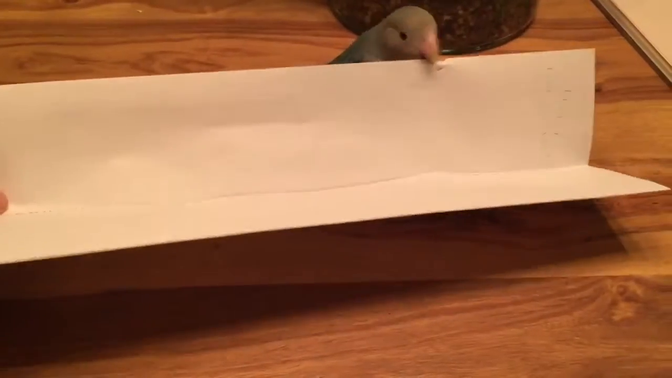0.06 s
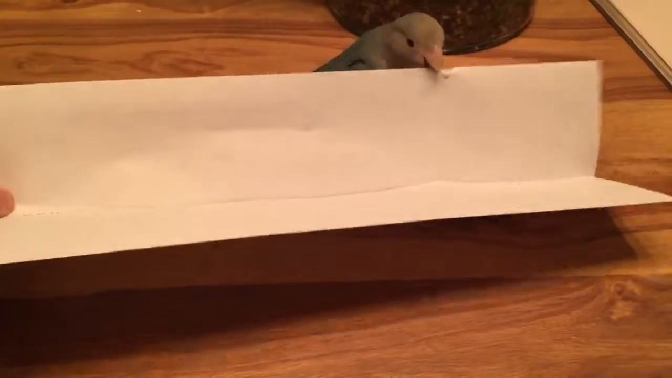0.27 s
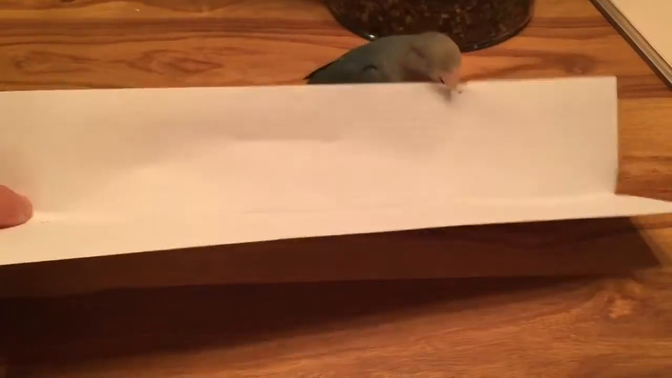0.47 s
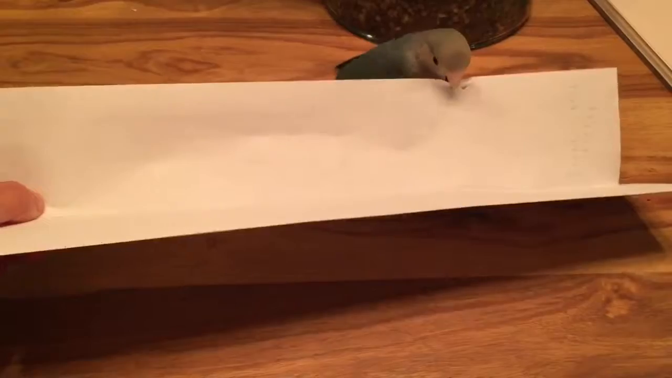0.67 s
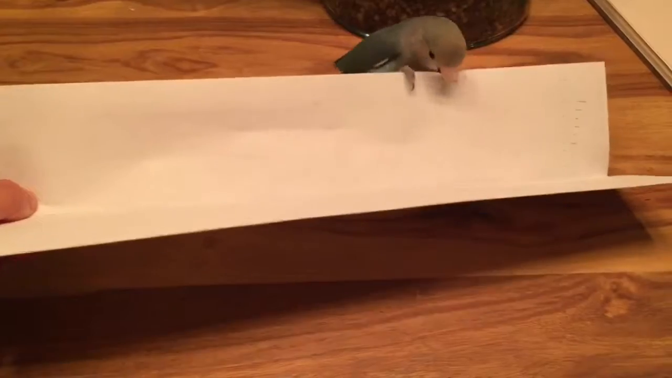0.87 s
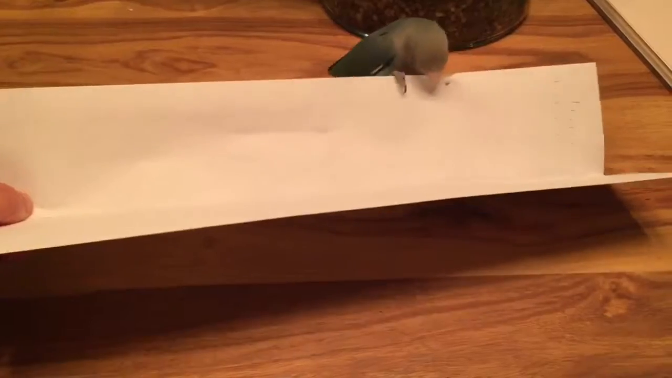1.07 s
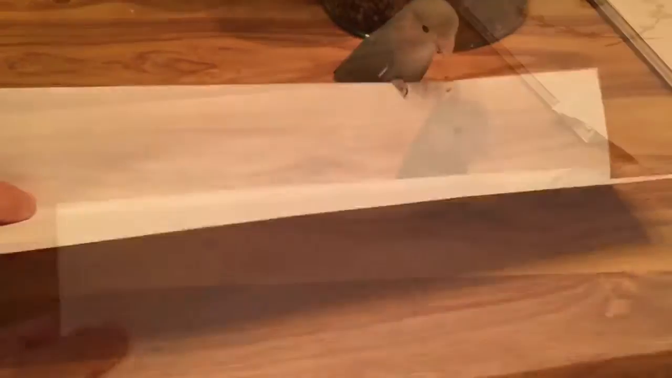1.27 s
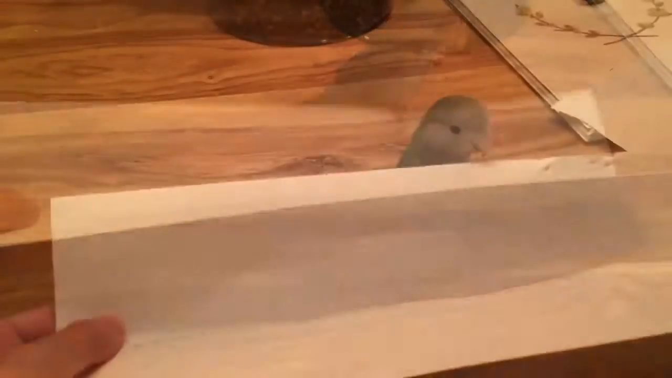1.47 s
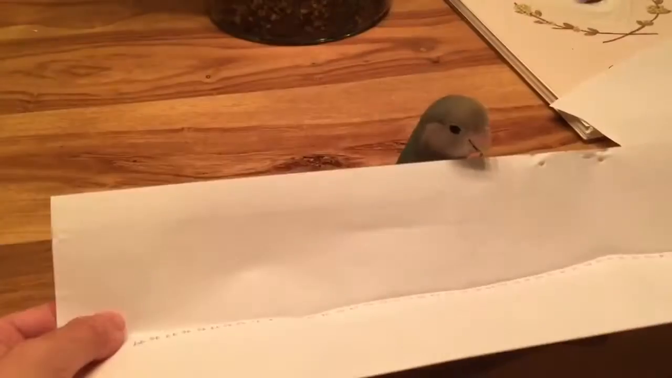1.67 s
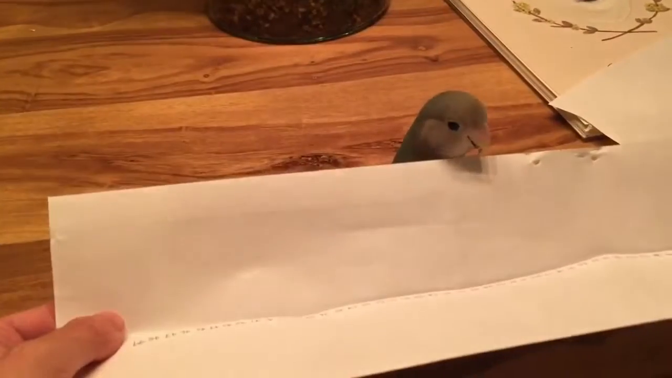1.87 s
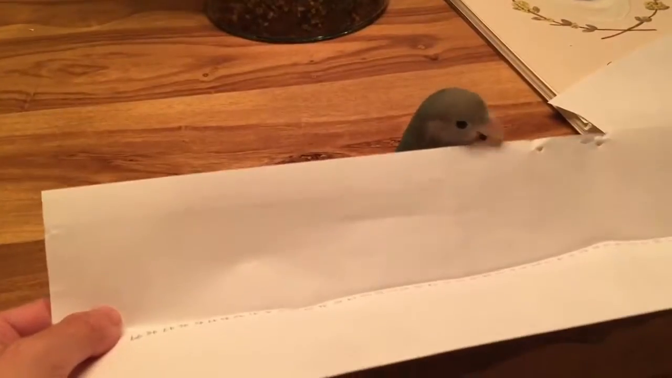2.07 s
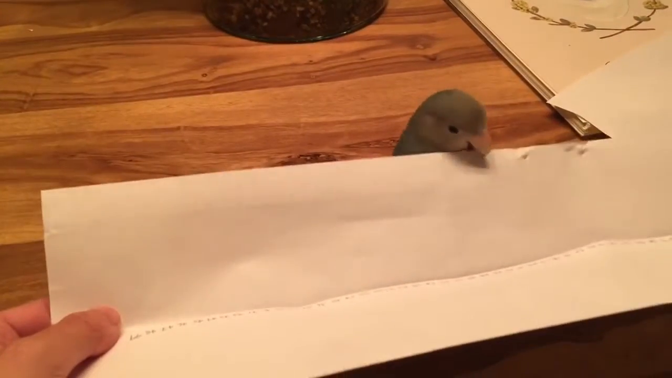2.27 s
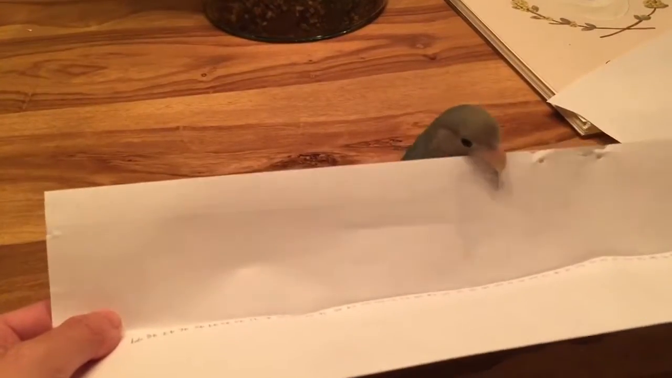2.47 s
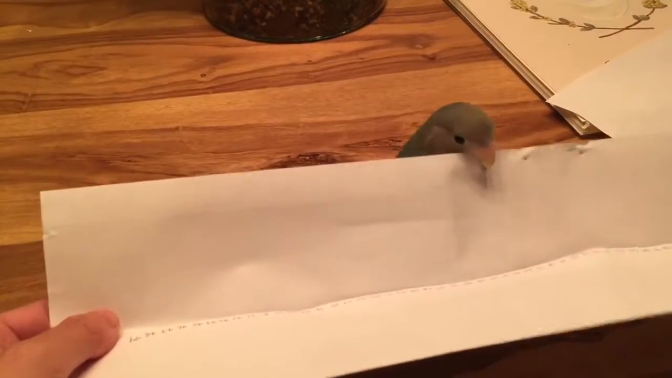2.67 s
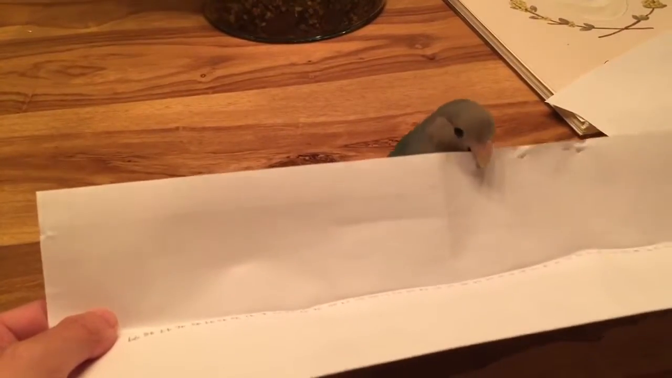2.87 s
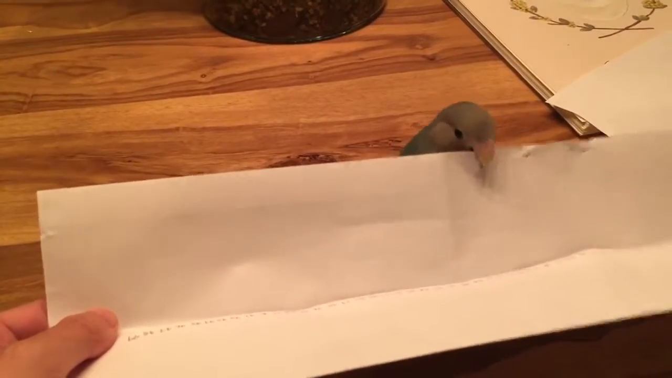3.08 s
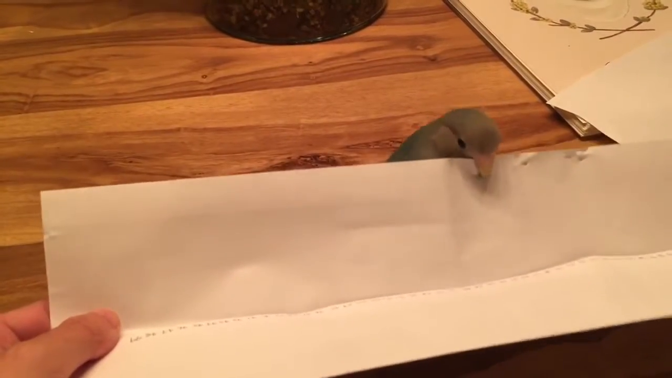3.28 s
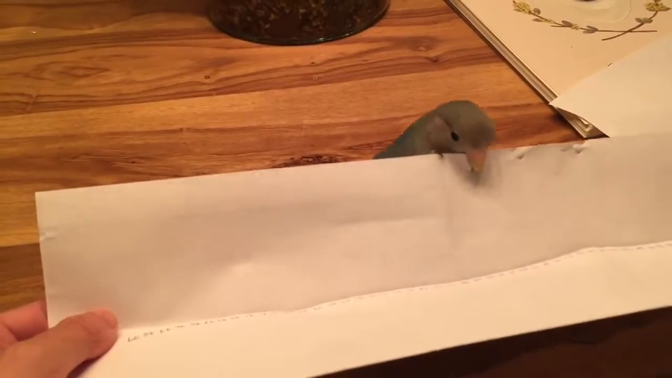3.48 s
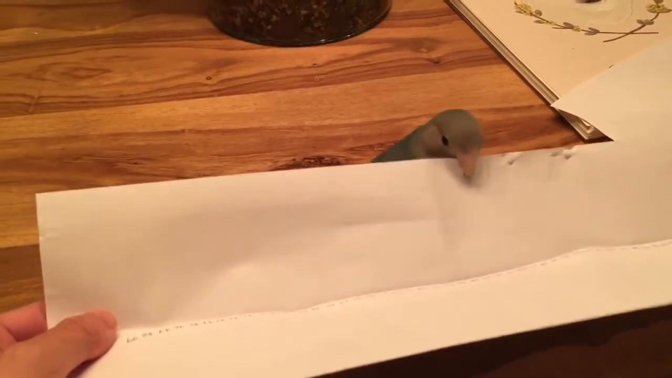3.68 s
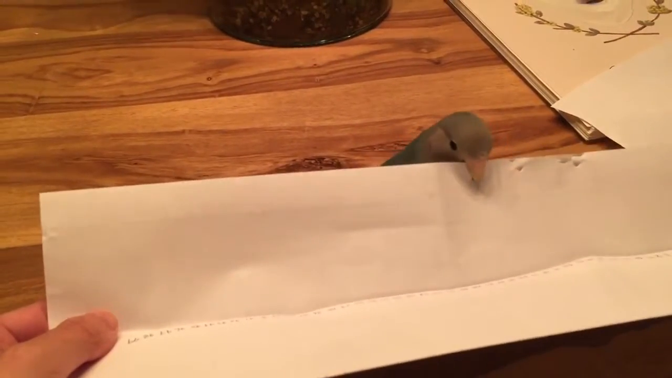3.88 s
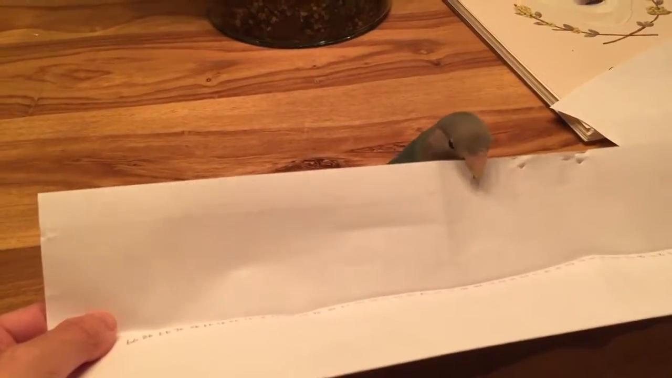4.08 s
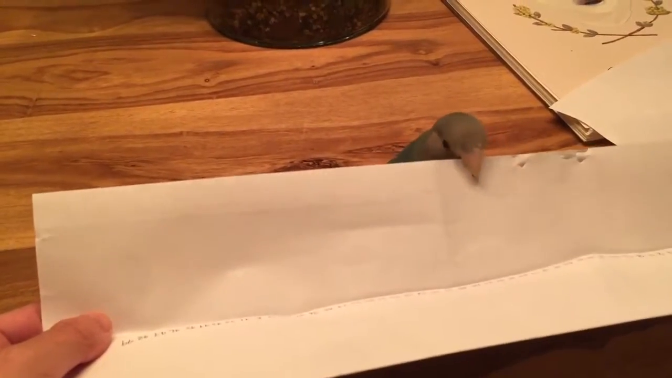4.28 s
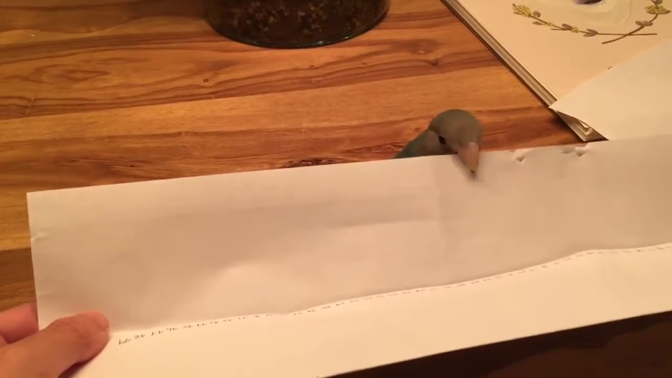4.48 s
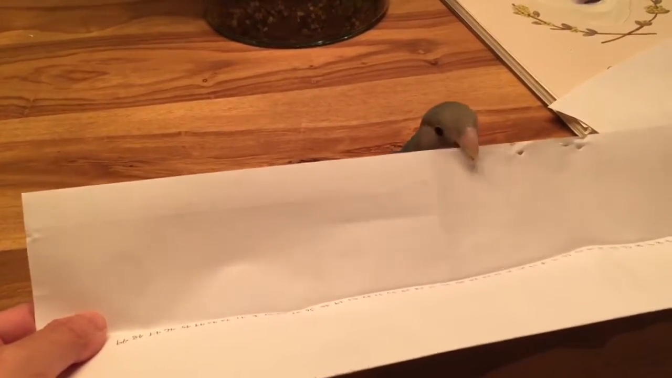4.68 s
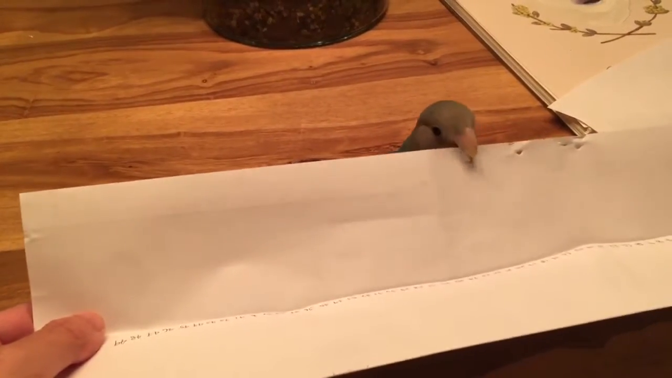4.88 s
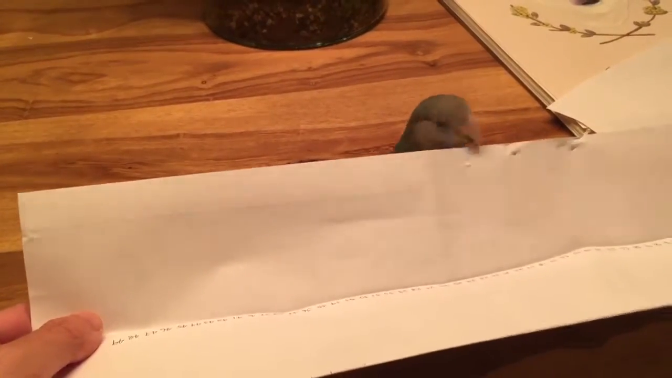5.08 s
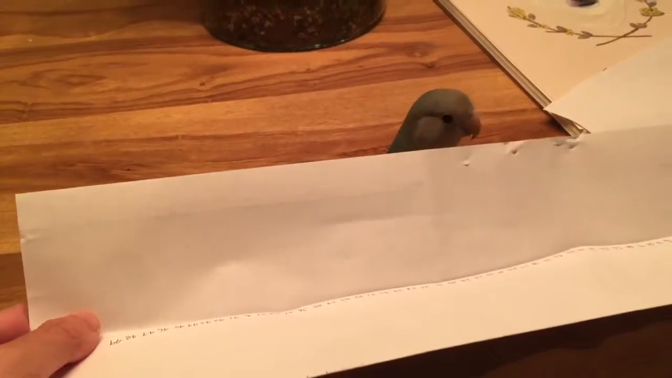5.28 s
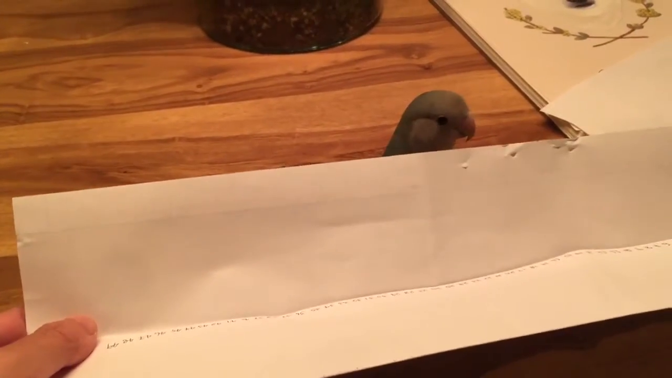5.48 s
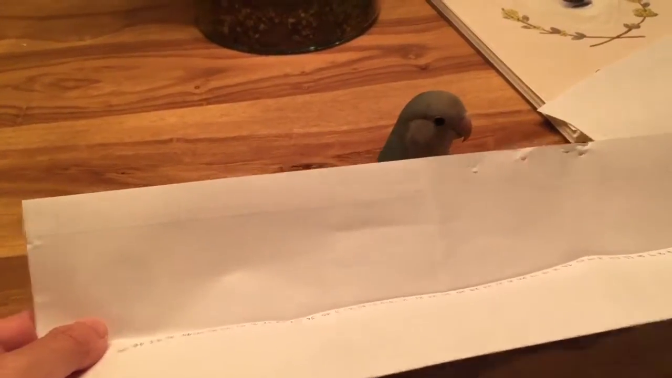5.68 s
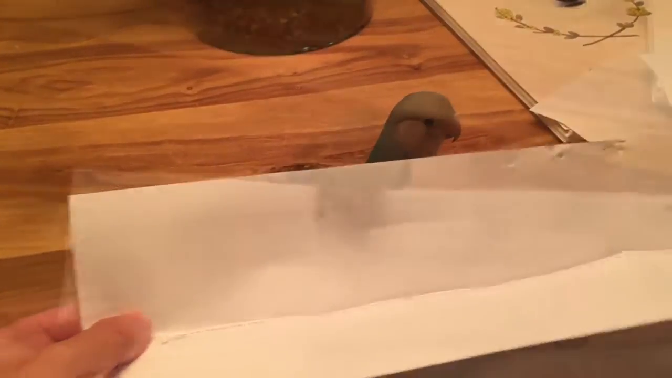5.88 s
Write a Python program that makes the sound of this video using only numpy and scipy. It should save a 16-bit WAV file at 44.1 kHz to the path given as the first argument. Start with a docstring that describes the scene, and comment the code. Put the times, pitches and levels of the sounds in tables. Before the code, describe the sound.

A small bird chews the edge of a hand-held paper sheet close to a phone microphone in a quiet room. From 0 s come small dry nibbles and scratchy rubs, with a sharp snap near 0.5 s, a harder one near 0.8 s and a tight run of crisp bites around 1 s. Fine crackling continues to about 1.4 s, then nearly stops apart from a faint tick at 1.55 s; the background hiss drops too. Light picking returns from 2.15 to 2.6 s, with firm snaps at 2.8 and 2.9 s. The loudest crack comes at about 3.3 s, followed by dense tearing scrapes and clicks until 3.8 s. Afterwards there are sparse, softer ticks and short crackles, one clearer snip at 5.2 s, and almost nothing after 5.3 s except a tiny scrape near 5.8 s. A faint, unsteady low hum runs throughout, and the room adds only a short, faint tail.

```python
"""Beak on a paper edge

A small bird bites along the edge of a hand-held paper sheet, close to a phone microphone, in a quiet room.
Snaps (a blow and a dying rattle) and scrapes (ticks over a rub) are noise forces; they excite resonances
of the sheet, its slow flexing and its tearing fibres. The room answers with a short decaying noise tail.
An appliance hums as unsteady sines and noise in low room modes; smooth noise makes the hiss."""
import sys
import numpy as np
from scipy import signal
from scipy.fft import rfft, irfft, next_fast_len
from scipy.io import wavfile
from scipy.ndimage import uniform_filter1d, map_coordinates

SR = 44100
rng = np.random.default_rng(int(sys.argv[2]) if len(sys.argv) > 2 else 0)


def int16_out(signal):
    """Quantize to a 16-bit WAV file."""
    q = np.round(np.clip(np.atleast_2d(signal).T, -1, 1) * 32767)
    wavfile.write(sys.argv[1], SR, q.astype(np.int16))


N = 261072
SIZE = 8192  # samples in the window of one snap or scrape
RING_NOTE_WIDTH, CRACK_NOTE_WIDTH = 0.1, 0.16  # note bandwidth over its centre frequency


def amp(db):
    """Level: a gain is ten to the power of dB / 20."""
    return 10 ** (np.asarray(db) / 20)


def unit(x):
    """Normalisation: scale each row to a root mean square of 1."""
    return x / np.sqrt(np.mean(np.abs(x) ** 2, axis=-1, keepdims=True) + 1e-20)


def along(points, hz):
    """Interpolation of (Hz, value) points on a logarithmic frequency axis."""
    f, v = np.transpose(points)
    return np.interp(np.log(hz + 1), np.log(f + 1), v)


def wobble(rate):
    """Slow modulation: a smooth curve through random knots, rate of them a second."""
    return map_coordinates(rng.standard_normal(int(N * rate / SR) + 4), [np.arange(N) * rate / SR])


def filtered(x, response):
    """Linear filtering: multiply the spectrum of x by a response of frequency."""
    m = next_fast_len(N + SR // 2)
    return irfft(rfft(x, m) * response(np.fft.rfftfreq(m, 1 / SR)), m)[:N]


def peak(f, hz, width):
    """Resonance of one causal damped oscillator, with unit gain at its centre."""
    return 1j * f * width / (hz * hz - f * f + 1j * f * width)


def shaken(force, modes, hz, spread, scatter_db, note=0):
    """Modal response: each force drives a broad hump at hz, modes of chance strength and its own note."""
    f = np.fft.rfftfreq(SIZE, 1 / SR)
    radiated = 1j * f / (1j * f + 0.35 * hz)  # a thin sheet sheds its bass poorly
    luck = amp(scatter_db * rng.standard_normal((len(force), len(modes))))
    resonances = np.array([amp(db) * peak(f, centre, width) for centre, width, db in modes])
    body = 1 + 0.9 * luck @ resonances
    hump = peak(f, hz, hz * spread) ** 2
    response = unit(body * (1 + note) * radiated * hump)
    return irfft(rfft(force) * response, SIZE)


def paper(s, force, db, thud_db, crack_db, hz, crack_hz, notes):
    """Superposition: a force on the edge rings the sheet, flexes it and cracks fibres.

    force(stretch) may lengthen its decay; the flap in the beak adds notes to the ring and the crack."""
    # Resonances of the sheet, its slow flexing and its tearing fibres.
    # Each row: centre in Hz, width in Hz, relative level in dB before the chance scatter.
    sheet_modes = [(910, 140, 6), (1110, 410, 8), (1490, 180, 3.5), (1600, 550, -8.5), (2020, 300, 2.5),
                   (2500, 275, -1), (3000, 610, 1.5), (3700, 570, 1), (4212, 370, 2), (4690, 230, 0.5)]
    thud_modes = [(190, 240, -10), (322, 49, -11), (570, 46, -0.5)]
    fibre_modes = [(5700, 1500, 12), (7500, 2100, -5.5), (8900, 9000, -1.5), (13100, 2700, -10),
                   (14800, 6400, -13.5)]
    f = np.fft.rfftfreq(SIZE, 1 / SR)
    high_hz, high_db, note_hz, note_db = notes
    note = amp(note_db) * peak(f, note_hz, RING_NOTE_WIDTH * note_hz)
    high = amp(high_db) * peak(f, high_hz, CRACK_NOTE_WIDTH * high_hz)
    ring = shaken(force(1), sheet_modes, hz, 1.425, scatter_db=2, note=note)
    thud = shaken(force(4.4), thud_modes, 500, 2.5, scatter_db=5.5)
    crack = shaken(force(0.74, fibres=True), fibre_modes, crack_hz, 14.0, scatter_db=2.5, note=note + high)
    sound = amp(db) * (ring + amp(thud_db) * thud + amp(crack_db) * crack)
    at = (s * SR).astype(int) + np.arange(SIZE)
    return np.bincount(at.ravel(), sound.ravel(), N + SIZE)[:N]


def bending(x):
    """Varying radiation: as the sheet bends, patches of frequency and time swell and sink."""
    depth_db = 2.0  # standard deviation of the patches
    z = signal.stft(x, nperseg=256)[2]
    field = uniform_filter1d(rng.standard_normal(z.shape), size=4, axis=0)
    field = uniform_filter1d(field, size=4, axis=1)
    return signal.istft(z * amp(depth_db * field / field.std()), nperseg=256)[1][:N]


def scrapes():
    """Stick-slip friction: fibres give way as ticks of chance size over a smoother rub, under a rounded stroke."""
    # The beak dragging on the edge.
    # Each row: start in seconds, nominal length in ms, strength in dB, crack gain in dB re ring,
    # centre in Hz, crack note in Hz, its level in dB, ring note in Hz, its level in dB.
    drags = [(0.0, 38.3, -40.5, -11.5, 1510.0, 6400, 2, 1700, 7),
             (0.04, 61, -60, -28, 1500, 6000, -1, 1200, 2), (0.121, 39, -48, -3.5, 2200, 7300, -1, 1880, 6),
             (0.159, 44, -74, -5, 2000, 5400, 4, 1900, 3),
             (0.218, 14, -61, -7.0, 2400.0, 14100.0, 4.0, 1960.0, -5),
             (0.267, 37.5, -39.5, -11, 1620, 6300, 4.0, 1920, -6),
             (0.312, 53, -58, -20, 1400, 6000, 0, 1000, 0),
             (0.382, 19, -45, -12, 2150, 5900.0, 3, 3630.0, -13),
             (0.474, 16, -51, -10, 1800, 6300, 4, 1700, 2),
             (0.499, 80, -54.5, -14, 2190, 6300, 9, 2600, -12),
             (0.573, 42, -51, -1.5, 2020.0, 5460, 4, 915, 9.5),
             (0.614, 53, -55.5, -20, 1500, 6300, 0, 2000, -5),
             (0.647, 67, -54.5, -31.0, 1670, 8900.0, 4.0, 1160, 2.5),
             (0.677, 31, -50.5, -11, 1800, 8400, 2, 2600, -8),
             (0.701, 33, -56, -27, 1300, 6300, -2.5, 1000, 8),
             (0.752, 43, -58, -16, 1900, 6000, 0, 2000, 0),
             (0.801, 120, -44, -20, 1570, 14500.0, 3, 1690, 5),
             (0.874, 52, -55, -12, 1780, 9400.0, 5, 1650.0, 5),
             (0.914, 62, -39, -3, 2220, 9600.0, -3, 960, -4),
             (0.958, 38, -42, -23.0, 1690, 9700.0, 4.0, 1490.0, -14),
             (1.0, 77, -47.5, -2, 1800.0, 6460, -3, 990.0, -3),
             (1.052, 39, -45, -6, 2500.0, 9450, 12, 3360, 0),
             (1.09, 56, -53.5, -2, 2200, 11600.0, 2, 1360, -4),
             (1.135, 40, -58.5, -18, 1800, 6100, 0, 1500, 0),
             (1.164, 102, -46, -11, 1770, 6100.0, -5, 1490.0, -7),
             (1.22, 89, -50.5, -12, 1780, 5800.0, -1, 1200.0, 0),
             (1.271, 37, -42, -19, 1340, 9500, 6, 955, 2),
             (1.309, 18, -49, -8, 1390, 7800.0, 0, 910.0, -11),
             (1.335, 59, -62, -14, 2000, 5400, 0, 2500, 0),
             (1.388, 45, -61, -14, 2580.0, 5400.0, 2, 2250.0, -1),
             (1.545, 45.0, -54.5, -1.5, 2850, 14100.0, 2, 2810.0, 2),
             (1.584, 65, -56, -0.5, 2710, 8820, 6, 3300, -9),
             (2.152, 29, -57.5, -14.0, 2070.0, 7400.0, 3.5, 1650.0, -9),
             (2.194, 22.4, -49, -6, 2020.0, 5900.0, -14, 2060, 9),
             (2.256, 63.0, -61, -8, 1470.0, 7600.0, -1, 1200.0, 1.0),
             (2.292, 99, -52.5, -10, 2180, 7500, 1, 4320, -6),
             (2.366, 15, -48.5, -10, 2750, 8250, 1, 3830, -7),
             (2.393, 24, -49, -6, 2430, 8300.0, 1, 3820, -7),
             (2.447, 45, -49.5, -8.5, 1900.0, 13100.0, 3, 1580, 4),
             (2.7, 31, -60, -9, 1500, 5770, 8, 960.0, 16),
             (2.726, 41, -44.5, -9, 1250.0, 5860, 0, 1490.0, 4),
             (2.759, 38, -46, -2.5, 1800.0, 6600.0, -9, 1500, -6),
             (2.808, 14.4, -41, -14, 2000.0, 7300.0, 4.0, 1030.0, -3),
             (2.832, 66, -53.5, -16, 1700.0, 6100.0, 4.0, 2450.0, 0),
             (2.932, 78, -54.5, -10, 2360, 6400.0, 9, 1090, 7),
             (3.0, 90, -66.5, -12, 2200, 6400, 0, 1100, 3),
             (3.104, 11, -52, -6.5, 1240.0, 14700, 6, 977, 2), (3.188, 18, -60, -4, 1400, 6430, 0, 1000, 3),
             (3.205, 63, -59, -9, 1360, 13200, -3.5, 920, 8),
             (3.292, 51, -52, -14, 1330, 13500.0, 4.0, 1490.0, -1),
             (3.345, 148, -38, -8.5, 2020.0, 6400.0, 2, 1980, -0.5),
             (3.412, 32, -33, -17, 3200, 6300.0, 6, 4120, -3),
             (3.428, 27, -29.5, -31, 2170, 6300.0, 2, 2060, -3),
             (3.438, 44, -35, -24, 1420, 14300.0, 4.0, 1250, 7),
             (3.471, 12, -39.5, -1, 3000.0, 14400, 0, 1600.0, 3),
             (3.491, 84, -46, -25, 1780.0, 12600.0, 4.0, 1380, -5),
             (3.519, 21, -37.5, -18, 2010, 5370, 11, 1420, 6.5),
             (3.546, 160, -55, -11.0, 1810.0, 12600.0, 0, 890.0, 5),
             (3.638, 18, -33, 1.5, 1450, 14700, -11, 3500, 15.5),
             (3.658, 115, -60, 0, 1850.0, 6440, -5, 1780, -11.5),
             (3.769, 87, -57, 0.5, 1900.0, 12600.0, 3, 1094, -6.5),
             (3.84, 70, -66, -6, 2200, 6400, 0, 3000, -1),
             (3.988, 23, -66, 5, 2165.0, 12300.0, 6, 880.0, -1.5),
             (4.068, 28, -60, -25, 1800, 6700, 0, 2100, 0),
             (4.089, 57, -51.5, -25, 1440, 6730, 4.0, 1400, 4.5),
             (4.176, 39, -62, -14, 1800, 6700, 0, 4300, 2),
             (4.395, 27.6, -53, 0, 2044, 6000.0, -0.5, 930, 6),
             (4.428, 36, -66, 4, 2240, 14440, 8, 1930.0, 6),
             (4.479, 58, -61, -3.5, 1290, 13400, 9, 1063, 4.0),
             (4.585, 31, -54.0, -5, 4000.0, 9400, 8, 4090.0, 4.0),
             (4.605, 26, -44.5, -7.5, 3700, 9400, 8, 4090.0, 2),
             (4.622, 25, -44, -1, 2800, 6130, -11, 1490.0, 9),
             (4.78, 28.4, -58.5, -8.5, 1415, 11370, 3, 922, 2.5),
             (4.828, 32, -64, -9, 2500.0, 13200, 7, 4510, 6),
             (4.859, 30, -65.5, -14.5, 950.0, 6740, 4.5, 884, 11),
             (4.956, 16, -59.5, -10, 1110, 14530, 2.5, 996, 8.5),
             (5.097, 37, -58, -10.5, 2360, 12300.0, 0.5, 4280, 7),
             (5.128, 55, -63.5, -7.5, 2530.0, 12270, 3, 4250, 0),
             (5.186, 36.4, -38, -11, 2000.0, 12400, -1, 1450, -16.5),
             (5.214, 26, -57, -5, 2500, 6300, -0.5, 1400, -5.5),
             (5.24, 42, -64, -22, 1495, 6250, -0.5, 910, 9.5),
             (5.776, 37, -62.5, 1, 2380, 8900.0, 0.5, 877, 2.5)]
    s, length, db, crack_db, hz, *notes = np.transpose(drags)[:, :, None]
    thud_at_50_db, thud_grows = -16.5, 0.22  # flexing re ring at -50 dB; its own rise for each dB of strength
    sheet_tick, fibre_tick = 0.08, 0.29  # gain of the ticks in the sheet and in the fibres
    u = np.arange(SIZE) / SR * 1000 / length
    rise = np.clip(4.4 * u, 0, 1) ** 2.1
    stroke = rise * np.clip(3 * (1.15 - u), 0, 1)
    ticks = (rng.random(u.shape) < 190 / SR) * amp(10 * rng.random(u.shape))  # about 190 a second
    ticks = uniform_filter1d(ticks, size=40) * 40  # each lasts 40 samples

    def force(stretch, fibres=False):
        """Amplitude modulation: noise follows stroke and ticks; each band catches at its own moments."""
        clumps = amp(2.17 * unit(uniform_filter1d(rng.standard_normal(u.shape), size=200)))
        grain = 0.46 + (fibre_tick if fibres else sheet_tick) * ticks
        return stroke * grain * clumps * rng.standard_normal(u.shape)

    thud_db = thud_at_50_db + (thud_grows - 1) * (db + 50)
    return bending(paper(s, force, db, thud_db, crack_db, hz, 8880, notes))


def snaps():
    """Impulsive release: the edge lets go in a sharp blow and a fast-dying rattle, then the sheet settles, bending."""
    # Beak snaps.
    # Each row: start in seconds, strength in dB, rattle t60 in ms, crack gain in dB re ring,
    # flexing gain in dB re ring, centre in Hz, crack note in Hz, its level in dB, ring note in Hz, its level in dB.
    bites = [(0.018, -32.5, 33, -40, -5.5, 1450, 6300.0, 4, 930, 2),
             (0.091, -30, 12.4, -40, -4.5, 930, 6100.0, 4, 1280, 27),
             (0.201, -38, 28, -4.0, -13, 2450.0, 6100, 1, 2500, 0),
             (0.277, -28.5, 28, -18, -14.5, 1710, 5800.0, 6, 1930.0, -2),
             (0.299, -32, 59, -23, -20, 1090, 5700.0, 4, 1960, -8),
             (0.368, -44, 23, -7, -13, 2500.0, 6000.0, 6, 830.0, 3.0),
             (0.383, -37, 32, -0.5, -11.5, 3370, 5770, -4, 3560, -7),
             (0.413, -46, 14, -7, -12, 2500.0, 13600.0, 4, 2540.0, 9),
             (0.485, -11.5, 22.5, -15, -27, 2010, 6400, 24.5, 1700, 11),
             (0.565, -39.5, 52, -16, -5.5, 2550, 5400.0, 4, 2430, -8),
             (0.785, -4.5, 19, -13, -24, 1700, 9300, 9, 1750, 1.5),
             (0.876, -49.5, 19, 4.5, -20, 1700, 7000, 5.5, 1700, 0),
             (0.914, -34.5, 27, 4, -25, 2250.0, 9400.0, 1.5, 2140.0, -5),
             (0.931, -47, 15, 3, -18, 2300, 6500, 4, 2300, 4),
             (0.942, -42, 15, -2.5, -23, 2320, 6000, 5, 2400, 1),
             (0.958, -18.5, 14, -5, -19.5, 1030, 9600.0, 4.5, 950, -18),
             (0.974, -32.5, 15, -4.5, -17, 3000, 6500, 4, 3100, 5),
             (0.981, -40.5, 17, 3.0, -16, 2040, 8300.0, 7, 1640, -2),
             (0.988, -11.5, 20.4, -6, -23, 1600, 9600, 0, 1490.0, -2),
             (1.047, -47.5, 15, 7, -19, 2000.0, 6500.0, 3, 1420, 13),
             (1.078, -37.5, 15, -3.5, -25, 1360.0, 9500.0, 2.5, 1130, 1),
             (1.096, -48, 15, 7, -16, 2000.0, 9700.0, 12, 1010.0, 12),
             (1.104, -50.5, 19, 7.5, -25, 2000.0, 11400.0, 10.5, 3330.0, 10),
             (1.111, -43.5, 12, 12, -23, 1360.0, 11100, 10.5, 1340, -3),
             (1.126, -55, 15, 10, -18, 2500.0, 6200.0, 3.5, 6170.0, 3.0),
             (1.139, -47, 17, 4.5, -26, 2500.0, 14000.0, -2, 3700, 6),
             (1.176, -43, 17, -15, -18, 1500, 6000, 4, 1400, 2),
             (1.1924, -49, 15, -8, -16, 2600, 5500, 4, 2850, 3),
             (1.206, -44, 15, -1, -18, 2800, 7600, 4, 3000, 12),
             (1.218, -32.5, 16, 7, -11, 1450, 6300, -6, 1490.0, -2),
             (1.232, -46.5, 15, 11.5, -15, 2000.0, 5700.0, 0, 1220.0, 2.0),
             (1.252, -37, 15, 1, -7, 2500.0, 7300.0, 4, 3260, 17),
             (1.273, -40, 21, -3, -9, 3000, 6200.0, 5, 3190, 6),
             (1.278, -33, 21, -4, -20, 3000, 6200.0, 5, 3300, 4),
             (1.283, -31.5, 24, -4.5, -4.5, 970, 9500.0, 8, 990.0, -15),
             (1.315, -42, 22, 0, -18, 3000.0, 7800.0, 4, 890.0, 1.0),
             (1.318, -37.5, 26, -7, -6.5, 790.0, 7800.0, 4, 910.0, -12),
             (1.331, -49, 17, 5, -22, 2000.0, 9700, 5, 2330.0, 6),
             (1.548, -49.5, 17, -1, -13.5, 3180, 5970, -0.5, 6060.0, -2),
             (2.153, -46, 20, -3, -12.5, 1490.0, 7300.0, 5, 1545, 6),
             (2.206, -42, 19, -8, -17, 2000.0, 6000.0, 1, 2060, 8),
             (2.258, -45, 18, -11, -11, 1350.0, 12000.0, 4, 1380, 7),
             (2.301, -49, 16, -3, -18, 4000, 7500, 3, 4420, 5),
             (2.33, -32, 14, 1, -17, 1730, 7400.0, 2.5, 1460, 5),
             (2.347, -40, 15, -4, -11, 3570.0, 8400.0, 4.5, 3600, -3),
             (2.374, -43, 23, -1, -22, 3700.0, 8200.0, 0, 3820.0, 4.0),
             (2.399, -46, 15, -6, -9, 3800, 7500, 3, 4620, 10),
             (2.406, -46, 33, -11, -6, 3500, 7500, 3, 3750, 8),
             (2.457, -53, 15, -8, -9, 1800, 7500, 3, 1350, 2),
             (2.465, -43, 15, -8, -18, 2500, 7500, 3, 2950, 2),
             (2.484, -34, 29, -40.0, -7, 960.0, 5740, 4, 875, 7),
             (2.533, -48, 26, -1.5, -11, 1010.0, 14400, 15, 2490.0, 14),
             (2.579, -52.5, 32, -5, -12.5, 2730, 6380, 2, 2760.0, 2),
             (2.728, -44, 15, -4, -8, 1300, 6000, 4, 1004, 2),
             (2.737, -33, 31, -33.0, -13, 920.0, 12050, 0, 940, 4),
             (2.805, -16.5, 27.4, -14.5, -22, 1380, 6240, 3, 1600.0, 4),
             (2.898, -10, 25, -25, -17.5, 2100, 6300.0, 5, 4740, -2),
             (2.988, -56, 13, 2, -12, 2500.0, 6500.0, 2, 1490.0, 2.0),
             (3.104, -46, 12, -5, -18, 969.0, 14540, 4, 990.0, -3),
             (3.148, -57.5, 15, 2.5, -8, 945.0, 11660, 2, 860.0, -1),
             (3.205, -40.5, 30, -2, -9, 1250.0, 13100.0, 0.5, 1940, 1),
             (3.275, -23, 18.4, -17, -12, 1110.0, 13600.0, 1.5, 1270, 2),
             (3.3275, 1.5, 22.6, -12.5, -28, 2070, 13200, 8.5, 1490.0, -11),
             (3.351, -41, 26, 13.5, -16, 2100.0, 6500, 3.5, 2100.0, 2.5),
             (3.375, -51, 13, 11.5, -15, 2000.0, 11600.0, 5.5, 1390.0, 1.5),
             (3.389, -27, 25, -6.5, -20, 2510, 6370, 5, 1630.0, -2),
             (3.430, -25, 17, -14, -22, 3000, 6300, 4, 2700, 8),
             (3.434, -34, 15, -20, -30, 1600, 6300, 4, 1250, 5),
             (3.455, -32.5, 18, -16, -26, 1400, 6300, 4, 1300, 9),
             (3.471, -31, 23, 3.5, -29, 2100.0, 14300.0, 5, 2110, 2.0),
             (3.527, -28, 19, -11, -18.5, 2500.0, 10300.0, 1, 1470.0, -2),
             (3.55, -40.5, 13, 7.5, -6, 1310.0, 12550, 10, 1345, 2.0),
             (3.615, -40, 13, 5.5, -21, 4150.0, 12500.0, 13, 4160.0, 5.0),
             (3.634, -28, 28, -7, -17, 1400, 13600.0, 3, 880, 18),
             (3.642, -34, 17, 2, -17, 3700.0, 5700.0, 7, 3470, 12),
             (3.649, -22, 18, -5.5, -20, 3800, 14500.0, 4, 3420, 6),
             (3.756, -18.5, 31, 1, -19, 1600, 6100, -3, 980, -6),
             (3.801, -43, 15, -1, -20, 3000, 6300, 5.5, 3000, 2),
             (3.83, -39, 11, 1, -21, 1070.0, 11400.0, 1, 1080.0, -1),
             (3.837, -43.5, 15, 0.5, -19, 3000, 11700.0, 4, 3630.0, 2.5),
             (3.907, -58.5, 14, 3, -15, 3775, 8000, 3.5, 3900, 2),
             (4.021, -47.5, 15, 4.5, -12.5, 3890, 12270, 8, 1030.0, 6.5),
             (4.064, -49, 18, -7, -9.5, 2080.0, 11950, 7, 2080, 8.5),
             (4.127, -44, 18, -16, -16, 1300, 6700.0, 5, 950, 5),
             (4.158, -27.5, 25, -7.5, -25, 1850, 11050, -4, 1430, -16),
             (4.194, -53.5, 15, 8.5, -19, 1900, 11800, 10, 1930.0, -2),
             (4.21, -61.5, 16, 5, -10, 2000.0, 11900.0, 4, 1930.0, 2.5),
             (4.252, -43.5, 19, 1, -14.5, 3600, 9500.0, 14, 3560, 9),
             (4.276, -39.5, 13, -16, -16, 926, 6400.0, 4.5, 823, -4),
             (4.289, -38.5, 14, -4, -11, 980.0, 7800.0, -1, 1007, -19),
             (4.3, -40, 10, 0, -13, 1103, 6300, 12, 910.0, -14),
             (4.405, -47, 12, -10, -5.5, 910, 6050, 3.5, 980, 12),
             (4.454, -53, 15, 3.5, -12, 2500.0, 14500, 5.5, 1900.0, 5.5),
             (4.482, -56, 16, -4, -9, 2500.0, 12700, 2.5, 1100.0, 0.5),
             (4.529, -63, 17, 0.0, -3, 3000.0, 6500.0, 9, 1060.0, 4.0),
             (4.542, -38, 32, -21, -23, 1060, 13560, 4, 1050, 6),
             (4.588, -51.5, 16, 0.0, -9.5, 4220, 7250, 4, 995, 2.0),
             (4.632, -40, 12, -4.5, -22, 4050, 5940, 4, 3690.0, 5.5),
             (4.655, -51, 15, 8.5, -9.5, 3990, 6900.0, 2, 4530.0, 1.5),
             (4.704, -62.5, 14, 12.5, -8, 886, 7220, 3, 2420, 6),
             (4.835, -48, 15, -4, -13, 2500.0, 13020, 5, 4540, 10),
             (5.113, -50.5, 15, -10, -5.5, 2110, 8930, 5, 2100.0, 1.5),
             (5.2, -23.5, 23, -28.5, -10.5, 2240, 12350, 3.5, 2500, -1),
             (5.294, -60.5, 17, 6.5, -8.5, 1136, 6500.0, 3, 845, 2)]
    s, db, t60, crack_db, thud_db, hz, *notes = np.transpose(bites)[:, :, None]
    over_db = db + 30  # strength over a -30 dB snap
    fibre_blow, fibre_blow_grows = 0.4, 0.2  # share of the blow reaching fibres at -30 dB; its rise in dB per dB
    ms = np.arange(SIZE) / SR * 1000
    n = np.arange(SIZE)
    blow = 2.29 * (n == SR // 1300) - 0.72 * (n == SR // 300)  # and its echo off the table
    rattle_gain = amp((0.89 - 1) * over_db)  # with the strength, the rattle rises 0.89 dB for each dB
    settle = amp(-34.5 - 60 * ms / 270) * (1 - ms / ms[-1])  # exponential decay under a linear fade

    def force(stretch, fibres=False):
        """Impulse and decay: the blow, then noise dying exponentially, slower as stretch grows."""
        share = fibre_blow * amp(fibre_blow_grows * over_db) if fibres else 1
        onset = 1 - np.exp(-ms / 0.17)
        rattle = 0.43 * rattle_gain * onset * amp(-60 * ms / (stretch * t60))
        return blow * share + rattle * rng.standard_normal((len(s), SIZE))

    def rustle(stretch, fibres=False):
        """Slow relaxation: faint noise as the sheet settles, the fibres 6.5 dB more quietly."""
        level = 0.39 * rattle_gain * amp(-6.5 * fibres)
        return level * settle * rng.standard_normal((len(s), SIZE))

    crack_hz = 8100 + 103 * over_db  # harder snaps crack higher
    high_hz, high_db, note_hz, note_db = notes
    let_go = [high_hz, high_db - 10, note_hz, note_db - 10]  # the flap's notes sink once the beak lets go
    struck = paper(s, force, db, thud_db, crack_db, hz, crack_hz, notes)
    settling = paper(s, rustle, db, thud_db, crack_db, hz, crack_hz, let_go)
    return struck + bending(settling)


def room(x):
    """Reverberation: table and walls answer with a noise tail, each frequency dying at its own speed."""
    # Decay of the room. Each row: frequency in Hz, t60 in seconds.
    decay = [(300, 0.18), (2000, 0.17), (8000, 0.098), (15000, 0.1)]
    hz, t, z = signal.stft(rng.standard_normal(SR // 2), SR, nperseg=256)
    t60 = along(decay, hz)[:, None]
    tail = signal.istft(z * amp(-60 * t / t60), SR, nperseg=256)[1]
    delayed = np.pad(x, (200, 0))  # samples
    return signal.fftconvolve(delayed, tail / np.linalg.norm(tail))[:N]


def hum():
    """Periodic and modal excitation: slightly unsteady motor tones over noise in the low room modes."""
    # Motor tones. Each row: frequency in Hz, first level in dB rms, waver in dB, later change of level in dB.
    motor = [(107.5, -61, 2, -10), (120.3, -55.5, 0.9, -0.5), (175.4, -67, 4.5, -1)]
    # Room modes in which the hum swells; each resonance acts twice.
    # Each row: centre in Hz, width of a single resonance in Hz, relative level in dB.
    room_modes = [(55.7, 16, -5), (70.6, 19, -7.5), (92, 16, 1.5), (109.7, 7.5, 5.5), (149.6, 16, 4.5),
                  (173, 12, 1.5), (198.4, 46, -6), (240, 82, -15)]
    # The tones glide to their later levels between these two times in seconds.
    glide_s = (1.15, 1.5)
    t = np.arange(N) / SR
    glide = np.interp(t, glide_s, [0, 1])
    tones = np.zeros(N)
    for hz, db, waver_db, change_db in motor:
        level = np.sqrt(2) * amp(db + change_db * glide + waver_db * wobble(4.4))
        tones += level * np.sin(2 * np.pi * hz * t + 0.27 * wobble(8.1))

    def modes(f):
        """Incoherent sum: the powers of the room modes add."""
        return np.sqrt(sum(np.abs(amp(db) * peak(f, c, w) ** 2) ** 2 for c, w, db in room_modes))

    drone = unit(filtered(rng.standard_normal(N), modes))
    return tones + amp(-60 + 1.5 * wobble(1.3)) * drone


def hiss():
    """Broadband noise: smooth air and microphone hiss, shaped by a fixed spectrum."""
    # Spectrum of the hiss. Each row: frequency in Hz, relative density in dB per Hz.
    spectrum = [(20, -13), (40, -14.5), (250, -6), (400, -8.5), (600, -16), (900, -11.5), (1300, -14.5),
                (2500, -17), (6000, -22.5), (12000, -27), (16000, -29.5)]
    # The hiss drops and then partly recovers. Each row: time in seconds, level in dB rms.
    levels = [(0, -64.5), (1.201, -65), (1.501, -71.5), (1.8, -69), (5.92, -68)]
    level = np.interp(np.arange(N) / SR, *np.transpose(levels))
    noise = filtered(rng.standard_normal(N), lambda hz: amp(along(spectrum, hz)))
    return amp(level) * unit(noise)


def scene():
    """Superposition of the paper, its reverberation, the hum and the hiss."""
    beak = scrapes() + snaps()
    return (beak + amp(-14.0) * room(beak) + hum() + hiss())[None]


def record(dry):
    """Saturation and band limiting: peaks round off, the treble has two notches and ends at 16.3 kHz."""
    held = dry[0] / (1 + np.abs(dry[0] / .85) ** 4) ** .25

    def response(hz):
        """Frequency response: two dips, a steep droop and a cutoff."""
        notches = 1 - 0.44 / (1 + ((hz - 10500) / 300) ** 2) - 0.32 / (1 + ((hz - 5150) / 300) ** 2)
        droop = 1 / (1 + (hz / 15400) ** 60)
        return notches * droop * (hz < 16300)

    return filtered(held, response)[None]


dry = scene()
out = record(dry)
int16_out(out)
```